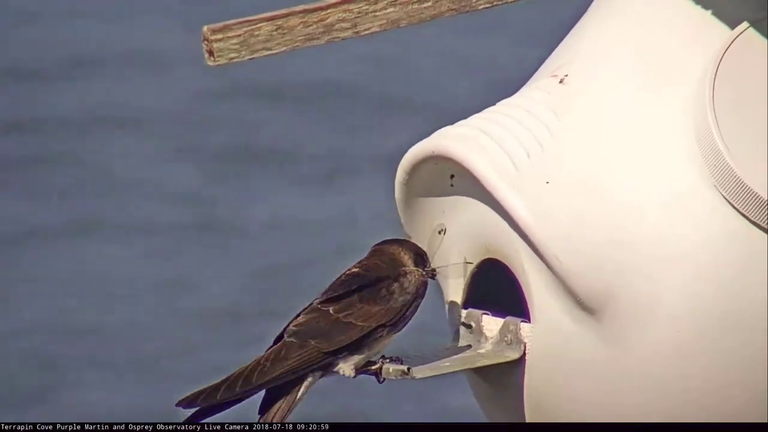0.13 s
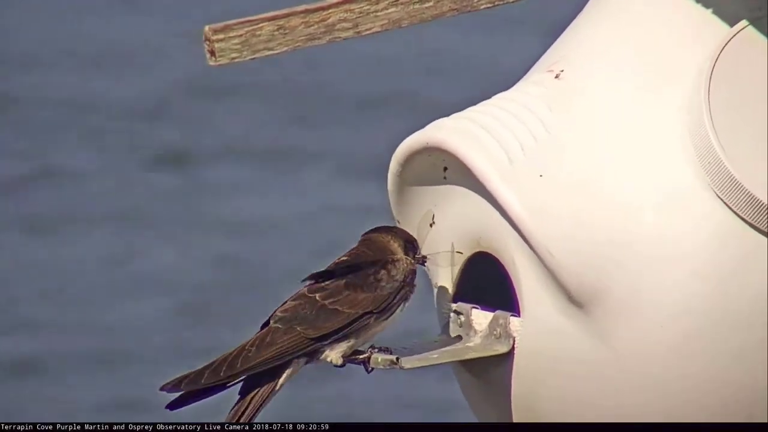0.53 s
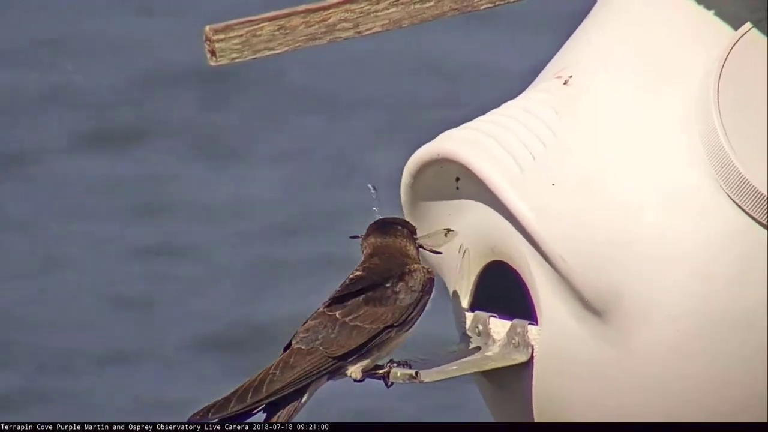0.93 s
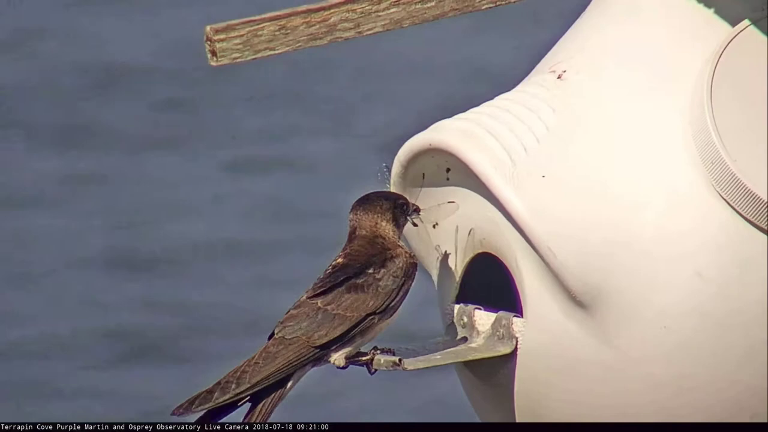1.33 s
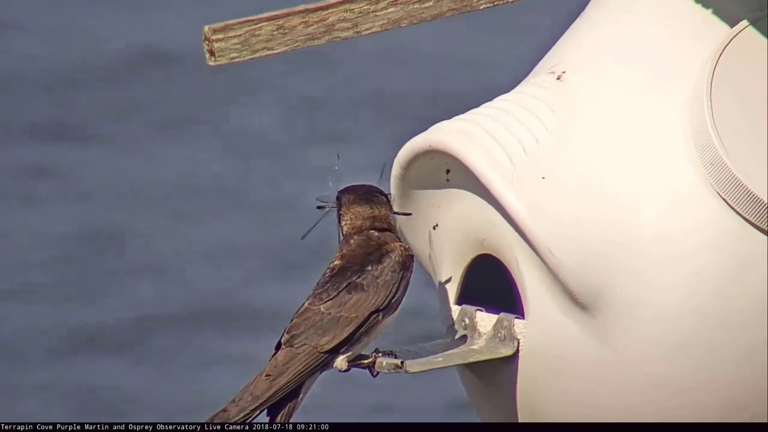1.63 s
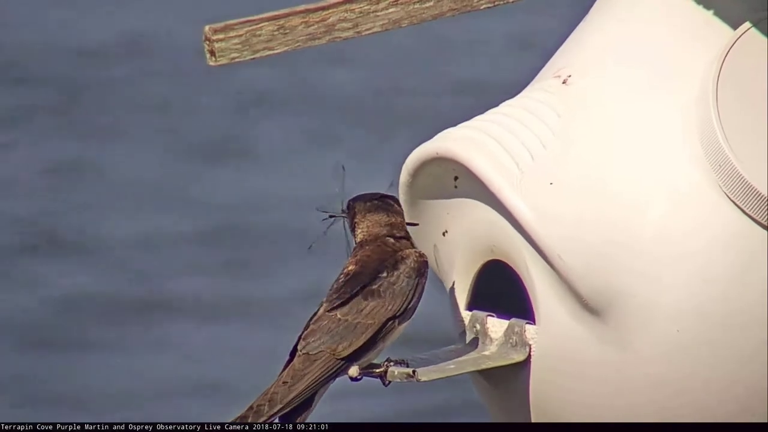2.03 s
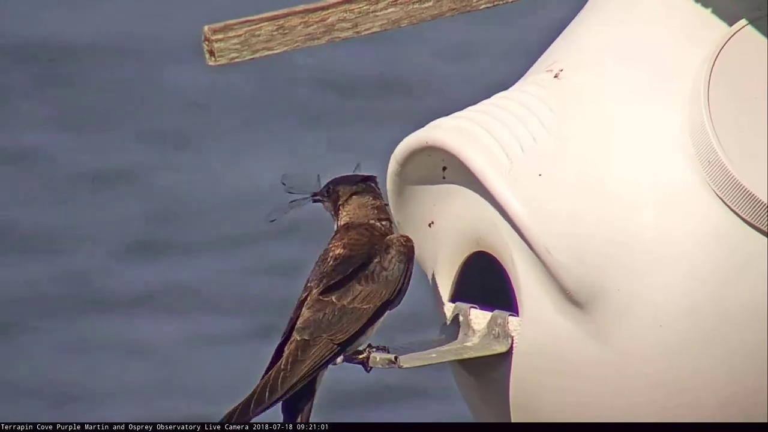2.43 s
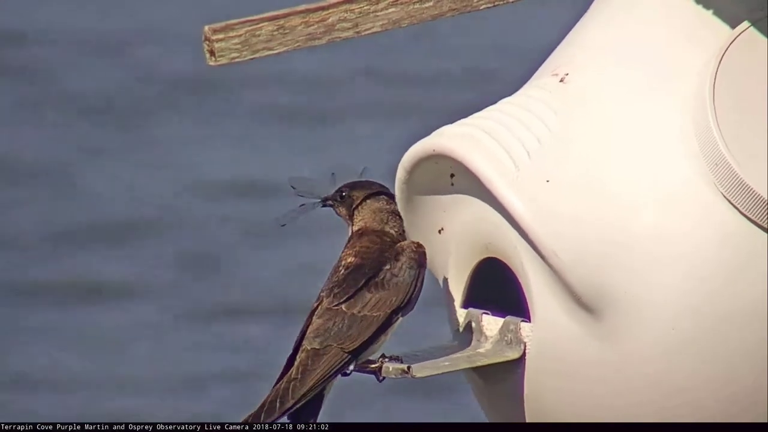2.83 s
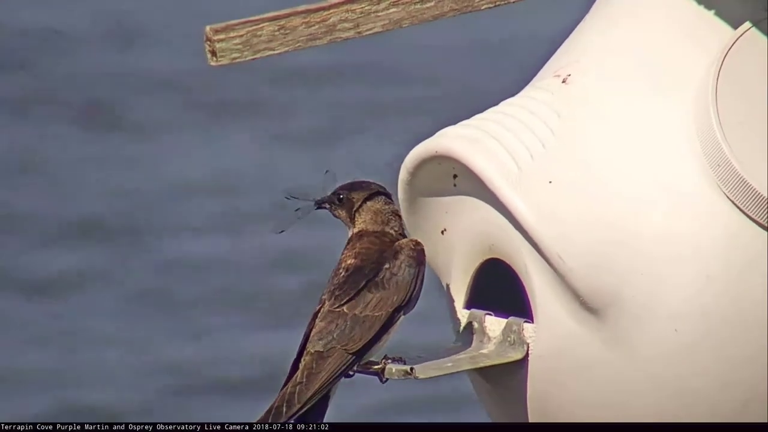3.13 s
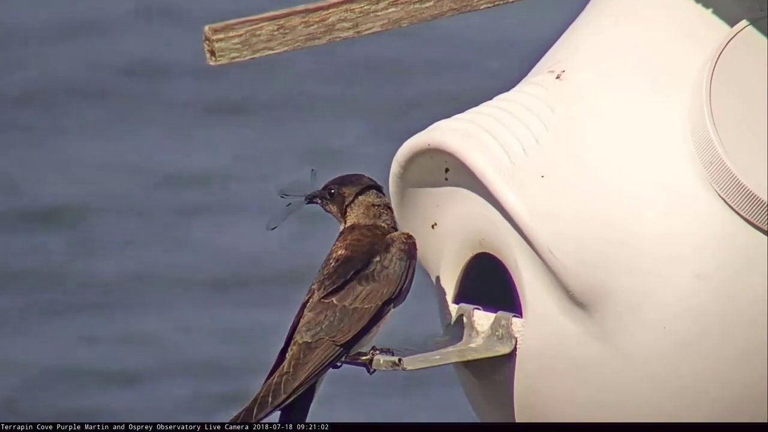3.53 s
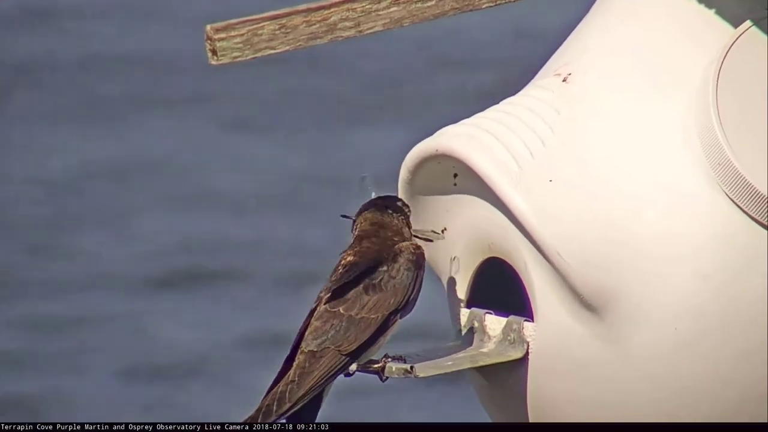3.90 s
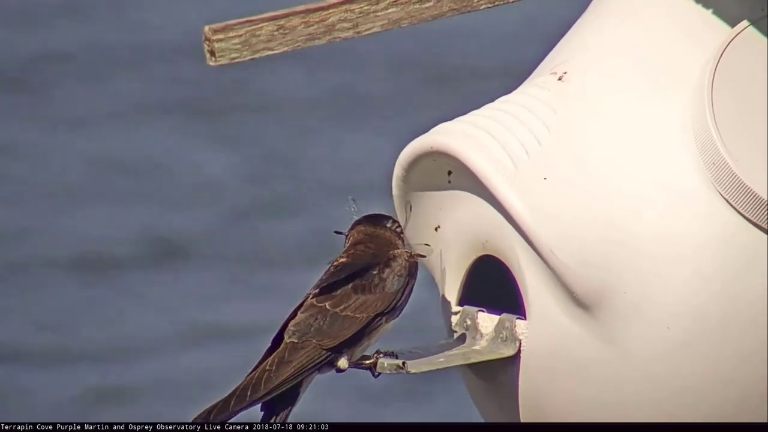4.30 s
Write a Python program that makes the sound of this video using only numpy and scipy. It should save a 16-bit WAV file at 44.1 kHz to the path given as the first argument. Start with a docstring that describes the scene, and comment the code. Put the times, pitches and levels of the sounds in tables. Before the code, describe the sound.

Birds call close to an outdoor microphone at a nesting colony, with quick downward-sliding chirps several times a second and short buzzy trills among them. About a second in comes a run of lower, clipped notes and a sharp bill snap, then the chirping carries on. Behind them, more birds twitter and blur into a steady hiss, over a light breeze, a faint low hum and thin insects.

```python
"""Purple martins call around their nest gourds beside open water, close to an outdoor camera.
Each note is a whistle sliding down through a fixed throat resonance (a range of pitches the throat
boosts); some notes buzz with a fast trill, and a bill snaps. More of the colony twitters farther off,
over a light breeze, a low hum and thin insects.
The camera adds faint mirror tones (shifted copies of each call) and clips the loudest note."""
import sys
import numpy as np
from scipy import signal
from scipy.fft import rfft, irfft, next_fast_len
from scipy.io import wavfile
from scipy.ndimage import map_coordinates

SR = 44100
rng = np.random.default_rng(int(sys.argv[2]) if len(sys.argv) > 2 else 0)


def unload_audio(sound):
    """Save the sound as a 16-bit wav file, at the path given as the first command line argument."""
    columns = np.transpose(np.atleast_2d(sound))
    # keep every value between -1 and 1, then stretch to whole-number steps
    steps = np.round(np.clip(columns, -1, 1) * 32767)
    wavfile.write(sys.argv[1], SR, steps.astype(np.int16))


N = 196597

# How strongly the throat and bill pass each pitch: (frequency [Hz], gain [dB])
THROAT = [(1600, -28.5), (2400, -10.5), (3200, -3), (3900, 0.5), (4700, -8), (6500, -23), (9000, -26)]
CHIRP_ARCH = -0.95  # below zero, the pitch drops fast and then levels off


def amp(db):
    """Turn decibels into a number to multiply by."""
    return 10 ** (np.asarray(db) / 20)


def colour(points, hz):
    """Read the gain at hz from a curve through (frequency [Hz], gain [dB]) points."""
    point_hz, level_db = np.transpose(points)
    return amp(np.interp(np.log(hz + 1), np.log(point_hz), level_db))


def wobble(rate, size):
    """A smooth random curve that passes through `rate` random values a second."""
    return map_coordinates(rng.standard_normal(4096), [np.arange(size) * rate / SR], mode="wrap")


def filtered(x, response):
    """Turn each frequency in x up or down by response(hz)."""
    size = next_fast_len(N + SR // 2)
    return irfft(rfft(x, size) * response(np.fft.rfftfreq(size, 1 / SR)), size)[:N]


def noise(spectrum):
    """Noise of average power 1, shaped by (frequency [Hz], gain [dB]) points."""
    shaped = filtered(rng.standard_normal(N), lambda hz: colour(spectrum, hz))
    return shaped / np.sqrt(np.mean(shaped ** 2) + 1e-20)


def add(track, start_s, sound):
    """Mix a sound into the track at the given time."""
    at = round(start_s * SR) + np.arange(len(sound))
    inside = (at >= 0) & (at < N)
    track[at[inside]] += sound[inside]


def whistle(note, throat, attack_s, release_s, octave_db, waver, flutter_db,
            arch=0, hook=0, screech=0, trill=False):
    """A sliding tone and two overtones; each swells as it passes through the throat resonance."""
    length, start_hz, end_hz, level_db, fade_db = note
    hook_s, settle_s = 0.0041, 0.032
    trill_hz, swing_hz, swing_db = 141.3, 193, 3.5
    t = np.arange(int(length * SR)) / SR
    progress = t / t[-1]
    bow = np.exp(arch * length * (1 - (2 * progress - 1) ** 2))  # bends the middle of the slide
    glide_hz = start_hz * (end_hz / start_hz) ** progress * bow
    glide_hz *= 1 - hook * np.exp(-t / hook_s)  # a hook starts the note a little low
    # the pitch is ragged until the bird's vibrating membranes settle
    ragged = waver * wobble(396.7, len(t))
    ragged += screech * np.exp(-(t / settle_s) ** 2) * wobble(1125, len(t))
    trill_rate = trill_hz * (1 + 0.091 * wobble(41.6, len(t)))
    beat = 2 * np.pi * (rng.random() + np.cumsum(trill_rate) / SR)
    pitch_hz = glide_hz * (1 + ragged) + trill * swing_hz * np.sin(beat)
    phase = 2 * np.pi * np.cumsum(pitch_hz) / SR
    ramp = np.clip(np.minimum(t / attack_s, (t[-1] - t) / release_s), 0, 1)
    force = np.sin(np.pi / 2 * ramp) ** 2 * amp(-fade_db * progress)
    force /= np.max(force * colour(throat, glide_hz))
    overtones = sum(colour(throat, k * glide_hz) * np.sin(k * phase) / (k - 1) for k in (2, 3))
    tone = colour(throat, glide_hz) * np.sin(phase) + amp(octave_db) * overtones
    # each trill cycle is loudest on its way down
    loudness = amp(level_db + flutter_db * wobble(205, len(t)) - trill * swing_db * np.cos(beat))
    return loudness * force * tone


def surroundings(x, near_db, tail_db, t60, count=14):
    """The gourds throw back quick, weak echoes; a thin tail from the shore fades 60 dB in t60 seconds."""
    t = np.arange(SR // 2) / SR
    early = np.zeros(len(t))
    for delay, sign in zip(rng.uniform(.001, .014, count), rng.choice([-1, 1], count)):
        early[int(delay * SR)] += sign * np.exp(-delay / 0.008)
    tail = rng.standard_normal(len(t)) * amp(-60 * t / t60) * (1 - np.exp(-t / 0.0081))
    echoes = amp(near_db) * early / np.linalg.norm(early) + amp(tail_db) * tail / np.linalg.norm(tail)
    echoes[0] += 1  # the sound that arrives directly
    return signal.fftconvolve(x, echoes)


def chirps(gain_db=1.17):
    """Quick falling calls close by; one that starts very high swells slowly and, if loud, screeches."""
    # One chirp a row: (time [s], length [s], start [Hz], end [Hz], relative level [dB], fade [dB])
    notes = [(-0.005, 0.03, 3807, 2515, -5, 4), (0.01, 0.036, 5300.0, 3580, -9.5, -16),
             (0.036, 0.05, 3193, 1560, -11.5, 7), (0.081, 0.044, 4240, 2920, -9, 7),
             (0.158, 0.027, 3840, 2330, -26.5, 2), (0.17, 0.039, 7000.0, 2190, -15.5, 24.0),
             (0.19, 0.056, 5850.0, 3760, -23.0, -6.0), (0.218, 0.044, 7000.0, 2413, -18, 9.0),
             (0.234, 0.086, 6920, 3400.0, -25, 8), (0.372, 0.08, 4323, 1727, 0, 15.5),
             (0.435, 0.029, 3040, 1990, -18, 4), (0.544, 0.045, 5500, 2750.0, -21, 6),
             (0.591, 0.049, 4245, 1924, -18, 13), (0.688, 0.048, 4300.0, 2400.0, -25.5, -9),
             (0.725, 0.03, 3344, 2210, -17.5, 2), (0.732, 0.05, 5616, 2770, -6.5, 25.0),
             (0.754, 0.054, 3094, 1904, -13, 12.5), (0.801, 0.041, 2633, 1932, -21, 6),
             (0.823, 0.025, 4240, 2490, -20.5, 4.0), (0.93, 0.034, 6120, 4190, -31, 8),
             (1.09, 0.084, 4610, 1960, -23.5, 5), (1.191, 0.039, 4350.0, 2433, -22.5, -7),
             (1.43, 0.051, 5580, 2870, -7.5, 21), (1.473, 0.029, 3790, 2150.0, -18, 23),
             (1.677, 0.035, 4290, 2410, -29, -17), (1.769, 0.03, 4025, 2650.0, -20, 16),
             (1.783, 0.055, 5100.0, 1992, -14.5, 26.0), (1.836, 0.044, 3110, 1790, -25, 8.0),
             (1.875, 0.037, 3940, 2490, -23.5, 10), (1.933, 0.018, 3450, 2690, -25, 5.0),
             (1.938, 0.04, 5570, 3350.0, -28, 0.0), (1.988, 0.05, 6134, 2860, -8, 22),
             (2.052, 0.055, 4920, 3076, -21, 1), (2.089, 0.048, 4600.0, 2693, -10, 11.5),
             (2.146, 0.038, 3303, 2036, -24.5, 15), (2.331, 0.033, 4075, 2630, -25, -3),
             (2.357, 0.04, 3750.0, 1950.0, -11.5, -1.5), (2.384, 0.042, 3620, 2110, -11.5, 8.5),
             (2.407, 0.064, 6100.0, 2450.0, -18.5, 14), (2.559, 0.065, 5170, 3124, -7, 5),
             (2.673, 0.036, 4330, 2370, -29.5, -11), (2.813, 0.076, 4520, 1504, -13, -3),
             (2.879, 0.036, 2800.0, 1720, -24.5, 7), (3.02, 0.071, 3800.0, 1611, -12, -0.5),
             (3.248, 0.024, 3840, 2170, -23.5, 12.0), (3.343, 0.036, 4360, 1753, -23.5, -7),
             (3.364, 0.055, 6210, 2478, -10, 19), (3.427, 0.026, 3216, 2480, -20.0, -13),
             (3.622, 0.035, 5350.0, 3190, -15, 19), (3.774, 0.051, 5660, 2814, -19.0, 11),
             (3.818, 0.052, 4776, 2844, -9.5, 20), (3.997, 0.059, 4216, 1604, -10, -5),
             (4.051, 0.052, 2956, 1352, -24, 5.0), (4.128, 0.039, 4600.0, 3500, -12.5, -5),
             (4.384, 0.042, 6970, 3350.0, -19.5, 5.5), (4.436, 0.024, 4890, 4030, -11, 7)]
    strain_from_hz, strain_full_hz = 4350, 4760
    out = np.zeros(N)
    for start_s, *note in notes:
        length, start_hz, _, level_db, _ = note
        strain = np.clip((start_hz - strain_from_hz) / (strain_full_hz - strain_from_hz), 0, 1)
        attack_s = 0.01 + 0.026 * strain * min(1, length / 0.056)
        screech = (0.016 + 0.0575 * strain) * min(1, amp(level_db + 7.5))
        chirp = whistle(note, THROAT, attack_s, release_s=0.0057, octave_db=-7.5, waver=0.0095,
                        flutter_db=2.2, arch=CHIRP_ARCH, hook=0.0592, screech=screech)
        add(out, start_s, surroundings(chirp, near_db=-5, tail_db=-8, t60=0.13))
    return amp(gain_db) * out


def colony_haze():
    """Distant birds blur into a steady hiss."""
    # Tone colour of the hiss: (frequency [Hz], relative level [dB])
    spectrum = [(700, -19), (1200, -17.5), (1700, -9.5), (2200, -4), (2700, 1.5), (3700, 5), (4600, -3.5),
                (5700, -4.5), (7000, -17.5), (8300, -24), (10000, -29), (11000, -24), (13500, -33),
                (15700, -32)]
    return amp(-30.5 + 0.93 * wobble(9, N)) * noise(spectrum)


def breeze():
    """Lightly moving air makes a soft, low rush."""
    # Tone colour of the breeze: (frequency [Hz], relative level [dB])
    spectrum = [(12, -35), (20, 2.5), (113, 6.5), (202, 1.5), (354, -2), (424, -2.5), (566, -6.5),
                (630, -12.5), (841, -15), (1500, -35), (1950, -88), (3300, -120)]
    return amp(-44.5 + 0.21 * wobble(6.56, N)) * noise(spectrum)


def hum(pitch_hz=96):
    """A faint low tone that wanders in pitch and loudness."""
    phase = 2 * np.pi * np.cumsum(pitch_hz + 3 * wobble(7, N)) / SR
    return amp(-50.0 + 3.4 * wobble(4.46, N)) * np.sin(phase)


def insects():
    """A thin, uneven, very high sizzle."""
    # One narrow band: (frequency [Hz], relative level [dB])
    spectrum = [(8500, -60), (9300, -7), (9650, -3), (10000, -7), (10800, -60)]
    return amp(-55.5 + 3.0 * wobble(16, N)) * noise(spectrum)


def far_birds(count=110, level_db=-34.0, spread_db=7):
    """Faint falling whistles from all over the colony."""
    out = np.zeros(N)
    for k, (when, span, high, loud) in enumerate(rng.random((count, 4))):
        top_hz = 3100 + 2100 * high
        note = (0.0211 + 0.02424 * span, top_hz, top_hz * .67, level_db + spread_db * loud, 3)
        call = whistle(note, THROAT, attack_s=.006, release_s=.006, octave_db=-15,
                       waver=.008, flutter_db=2, arch=CHIRP_ARCH)
        add(out, (k + when) / count * N / SR, call)
    return surroundings(out, near_db=-8, tail_db=-6, t60=.35)[:N]


def buzzes(gain_db=2.0):
    """Slowly sinking trilled notes, often one from each side of the bird's voice box."""
    # One buzz a row: (time [s], length [s], start [Hz], end [Hz], relative level [dB], fade [dB])
    notes = [(0.409, 0.26, 3290, 2817, -21, 8.0), (0.416, 0.15, 3827, 3432, -14, 12),
             (1.262, 0.17, 3587, 2460, -25, 10), (1.288, 0.17, 4000.0, 3530, -22, 9.0),
             (1.401, 0.11, 3430, 2586, -16.5, 0), (1.777, 0.11, 4100.0, 3415, -20, 6.5),
             (2.117, 0.068, 3325, 2856, -17, 5), (2.173, 0.15, 3900, 2507, -24.5, -1.5),
             (2.411, 0.043, 3500.0, 3360, -16, 2), (2.691, 0.06, 3863, 3604, -22.5, -1),
             (2.86, 0.15, 3660, 2696, -15.5, -0.5), (2.876, 0.073, 3800.0, 3590, -20, 11),
             (3.176, 0.1, 3740, 3490, -18.5, -8.5), (3.4, 0.12, 3860, 2800.0, -23, -4),
             (3.527, 0.098, 4264, 3416, -24, -7), (3.545, 0.17, 3637, 2566, -22.5, 2),
             (3.903, 0.11, 3896, 3513, -17, -1.0), (4.07, 0.19, 3640, 3177, -17, 33),
             (4.098, 0.19, 3107, 2660, -22.5, 1.5), (4.165, 0.097, 3500.0, 3050.0, -14, 10.5),
             (4.408, 0.06, 3517, 3330, -19, -2)]
    out = np.zeros(N)
    for start_s, *note in notes:
        buzz = whistle(note, THROAT, attack_s=0.02, release_s=0.024, octave_db=-22,
                       waver=0.01345, flutter_db=2.0, trill=True)
        add(out, start_s, surroundings(buzz, near_db=-11, tail_db=-10, t60=0.17))
    return amp(gain_db) * out


def chips():
    """Short, low notes in runs that sink in pitch, so close by that they barely echo."""
    # One chip a row: (time [s], length [s], start [Hz], end [Hz], level [dB], fade [dB])
    notes = [(1.023, 0.029, 2698, 1580, -10, 22.5), (1.092, 0.026, 2554, 1810, -17, 12),
             (1.155, 0.028, 2396, 1695, -15, 14), (1.423, 0.007, 3490, 3200, -1.5, 8),
             (1.519, 0.0111, 3464, 2680, -8.5, 3), (1.546, 0.0078, 2180, 1900, -25, -1),
             (1.567, 0.014, 2700, 2490, -10.5, 4.5), (1.597, 0.034, 2390, 2098, -15, 2.5),
             (1.64, 0.041, 2003, 1820, -20, 0), (1.688, 0.039, 1744, 1615, -22.5, 3),
             (1.738, .04, 1550, 1465, -34.5, 8)]
    # The throat's flatter response for chips: (frequency [Hz], gain [dB])
    throat = [(1300, -13), (2400, 10), (7000, -1), (12000, -22)]
    out = np.zeros(N)
    for start_s, *note in notes:
        chip = whistle(note, throat, attack_s=0.0027, release_s=0.0027, octave_db=-15,
                       waver=0.025, flutter_db=2.6, arch=4.3)
        add(out, start_s, surroundings(chip, near_db=-6.5, tail_db=-40, t60=.2))
    return out


def bill_snaps(decay_s=0.005):
    """Each snap of a bill is a burst of noise that dies almost at once."""
    # One snap a row: (time [s], level [dB])
    snaps = [(1.4233, -24), (1.477, -11), (1.5215, -40)]
    # Tone colour of a snap: (frequency [Hz], relative level [dB])
    spectrum = [(300, -4), (1500, -15), (3500, -3), (6500, 3), (10000, -18), (15000, -12)]
    t = np.arange(SR // 20) / SR
    bursts = np.zeros(N)
    for start_s, level_db in snaps:
        add(bursts, start_s, amp(level_db - 60 * t / decay_s))
    return bursts * noise(spectrum)


def air_puff():
    """A puff of air hits the microphone with a brief, low rumble."""
    # The puff's swell: (peak time [s], width [s], level [dB])
    puffs = [(1.838, .024, -26.5)]
    # Tone colour of the rumble: (frequency [Hz], relative level [dB])
    spectrum = [(20, -10), (40, -3), (62, 2), (115, 0), (200, -15), (400, -35), (1000, -80)]
    t = np.arange(N) / SR
    swell = sum(amp(db) * np.exp(-.5 * ((t - peak_s) / width) ** 2) for peak_s, width, db in puffs)
    return swell * noise(spectrum)


def scene():
    """The birds and their background, mixed into one channel."""
    birds = chirps() + chips() + buzzes() + bill_snaps() + far_birds()
    return (birds + insects() + colony_haze() + breeze() + air_puff() + hum())[None]


def record(dry):
    """The camera's uneven sampling adds mirror tones and grit; it clips peaks and cuts the top treble."""
    # Copies of the sound, moved in steps of about 4 kHz: (shift [Hz], gain [dB])
    shifts = [(-4000, -21.5), (4006.5, -22.5), (8001.5, -28.5), (11998.5, -33), (-8000, -30.5),
              (-12000, -34), (-16000, -35.5)]
    # Tone colour of the grit: (frequency [Hz], relative level [dB])
    grit_spectrum = [(300, 13.5), (1200, -10.5), (3000, -8), (6000, -11.5), (12000, -10.0)]
    low_cut_hz, top_hz = 1200, 15750
    t = np.arange(N) / SR
    treble = filtered(dry[0], lambda hz: hz ** 2 / (hz ** 2 + low_cut_hz ** 2))
    shiftable = signal.hilbert(treble)  # in this form, one multiplication shifts every frequency
    mirrors = sum(amp(db) * np.real(shiftable * np.exp(2j * np.pi * hz * t)) for hz, db in shifts)
    # random errors in the sample timing make a noise that follows the loudness of the calls
    grit = amp(-17.5) * shiftable.imag * noise(grit_spectrum)
    clipped = np.clip(dry[0] + mirrors + grit, -1, 1)
    return filtered(clipped, lambda hz: hz < top_hz)[None]


dry = scene()
out = record(dry)
unload_audio(out)
```